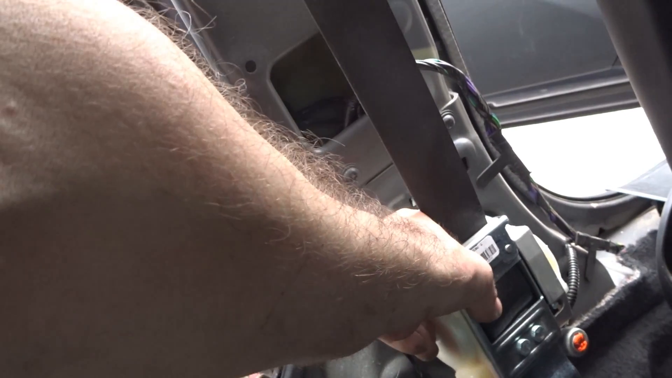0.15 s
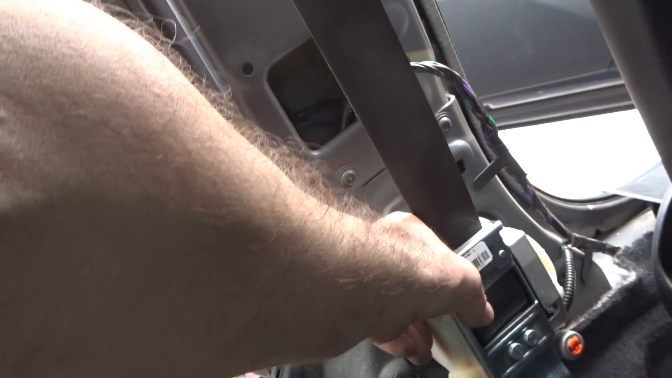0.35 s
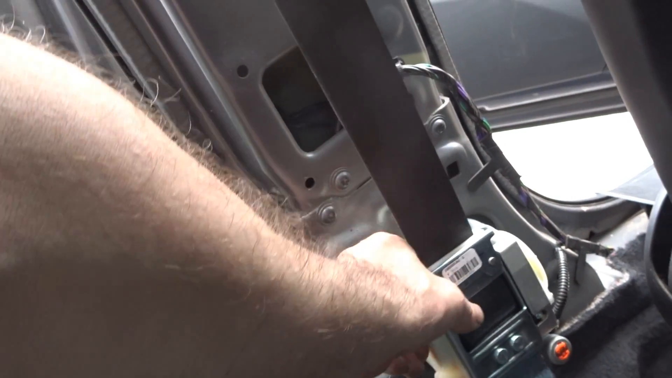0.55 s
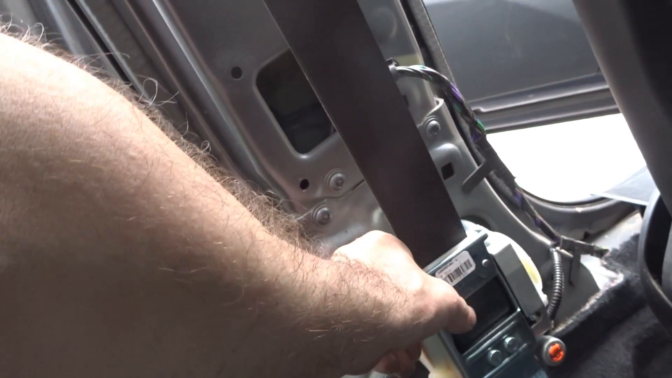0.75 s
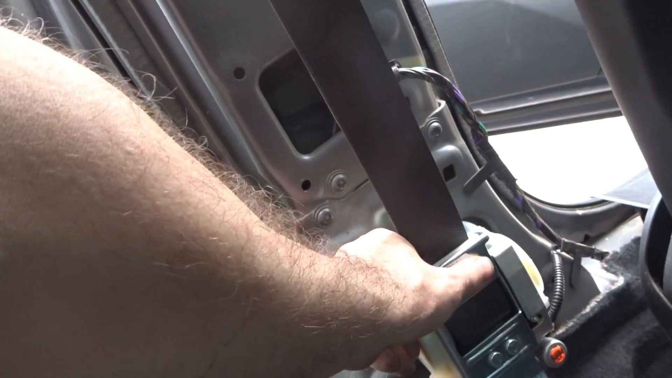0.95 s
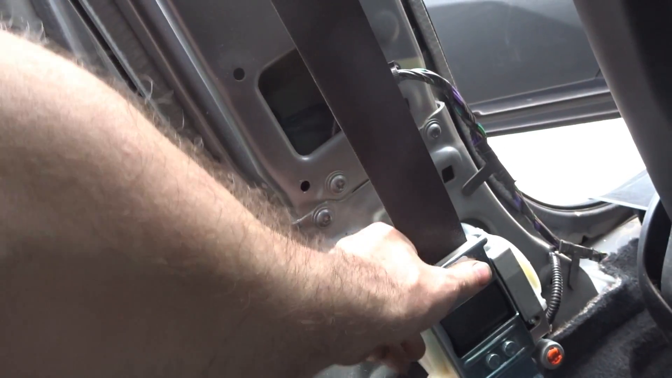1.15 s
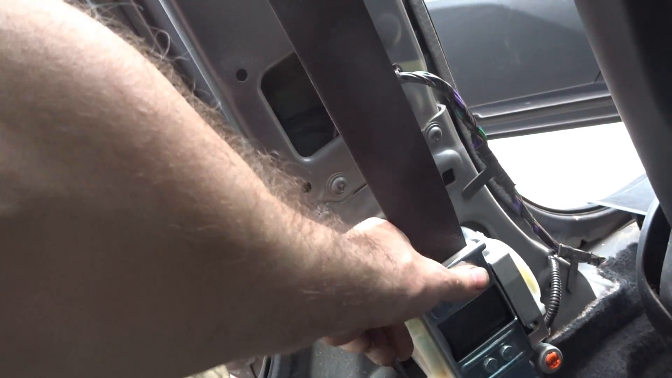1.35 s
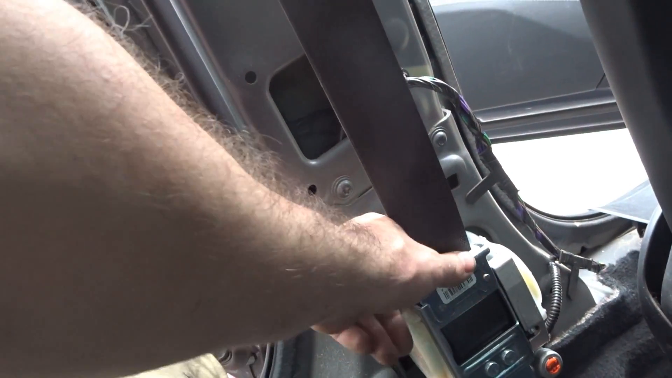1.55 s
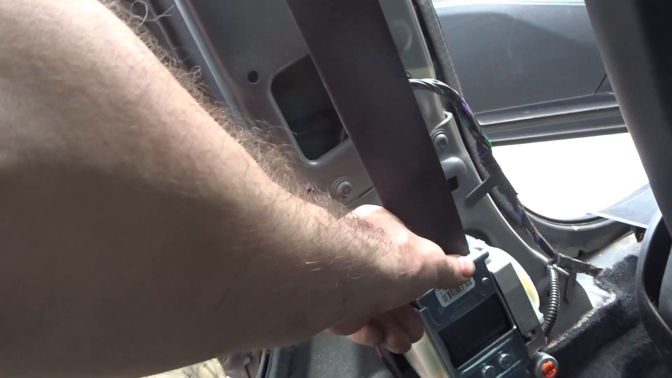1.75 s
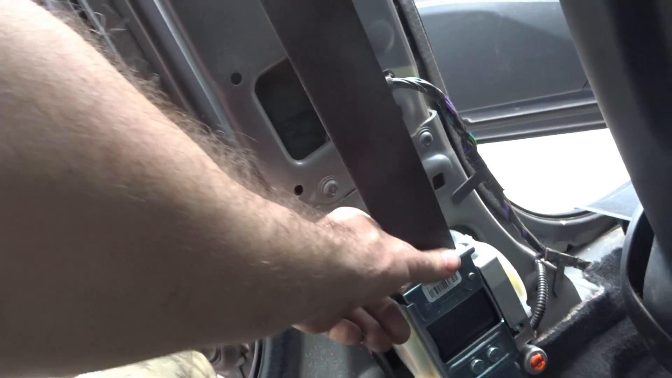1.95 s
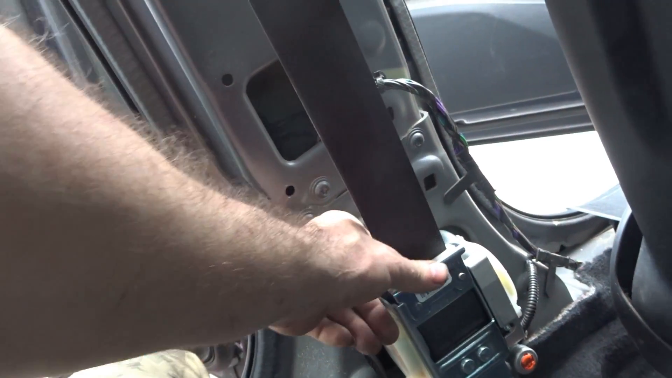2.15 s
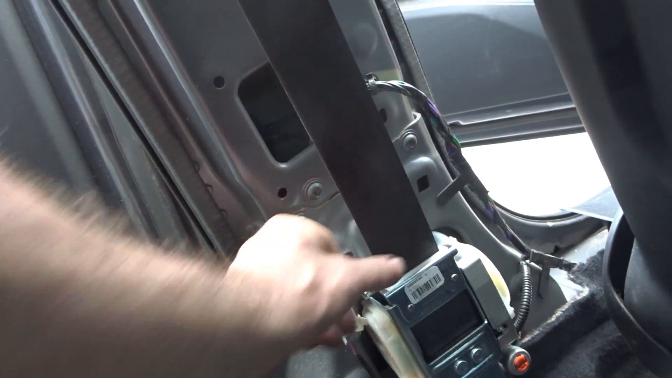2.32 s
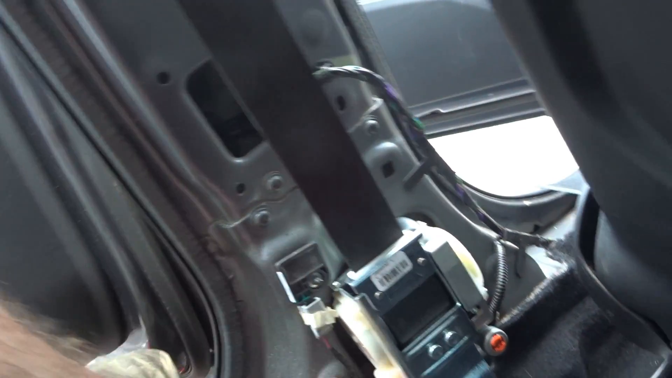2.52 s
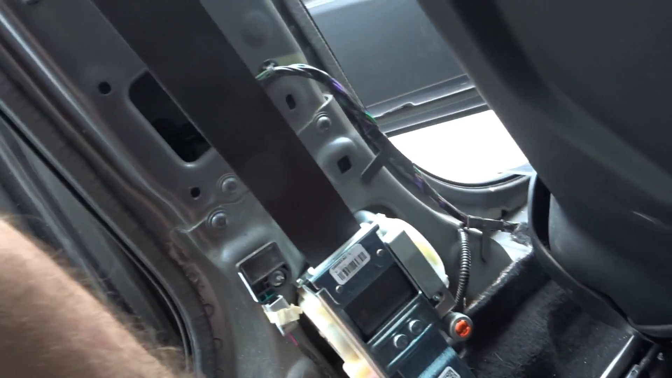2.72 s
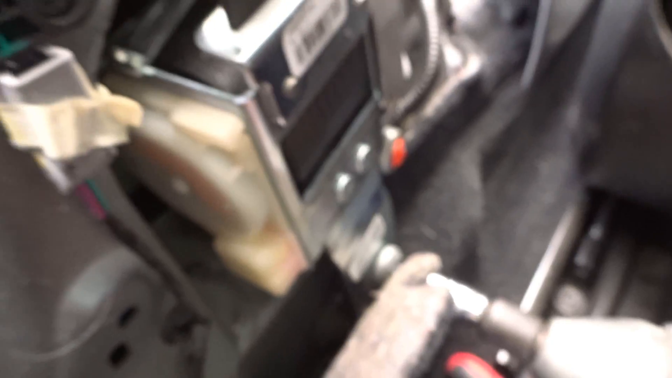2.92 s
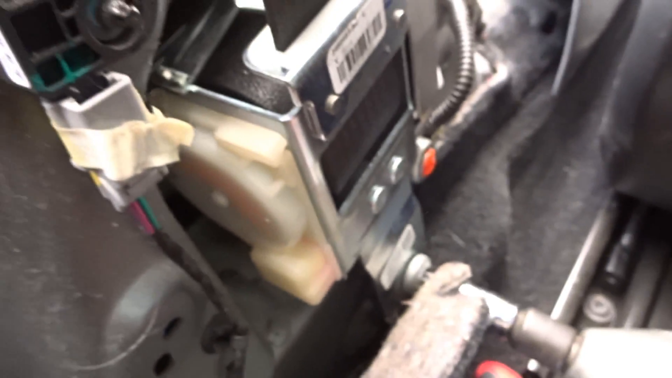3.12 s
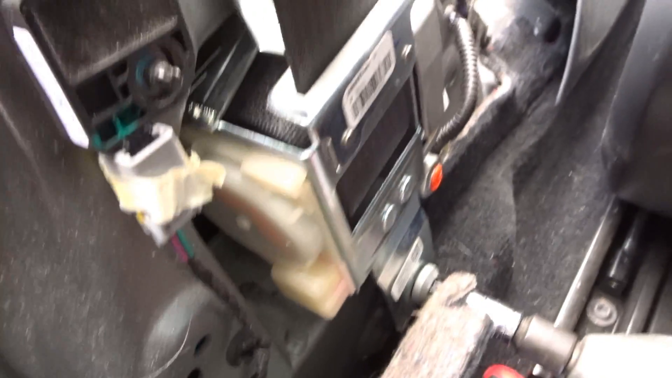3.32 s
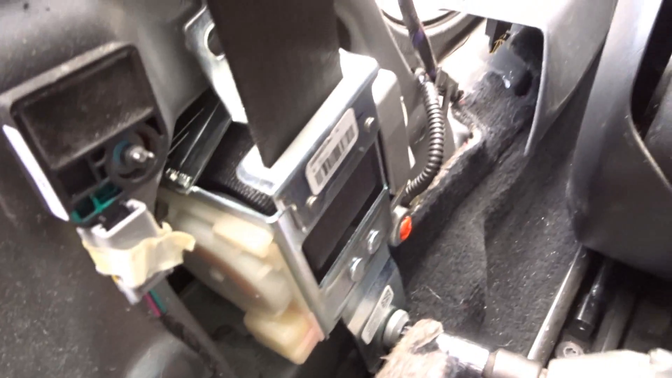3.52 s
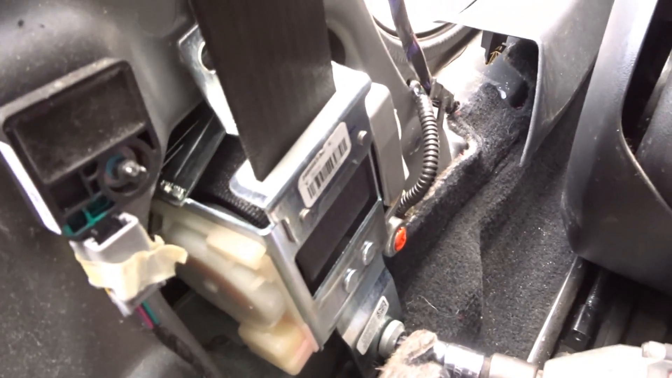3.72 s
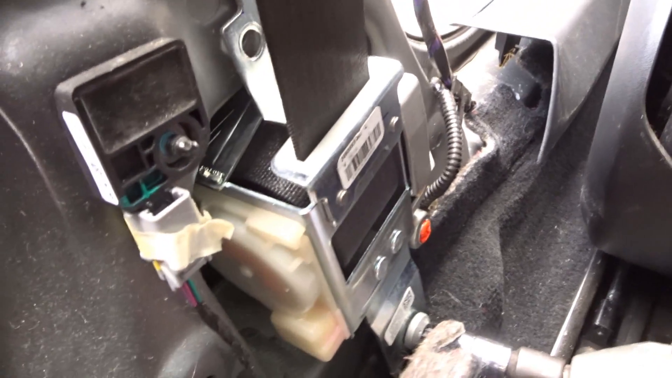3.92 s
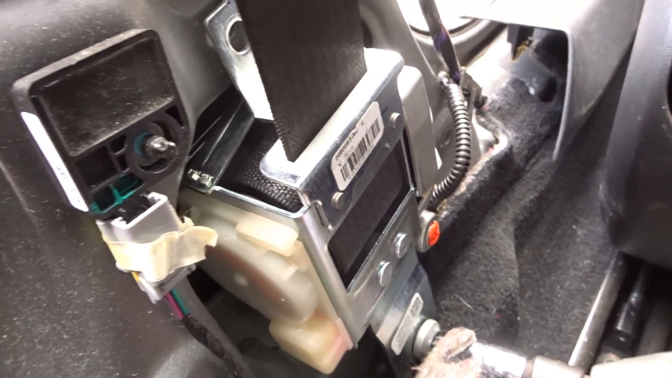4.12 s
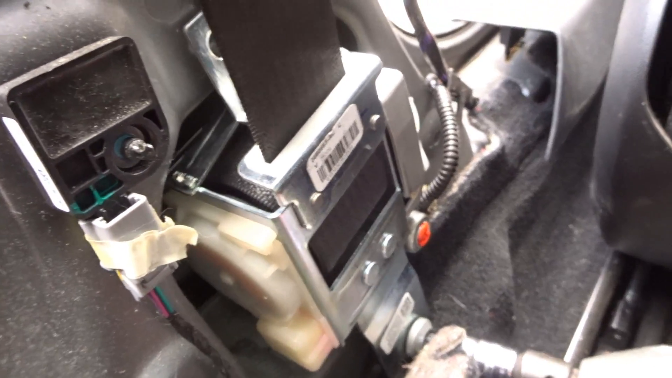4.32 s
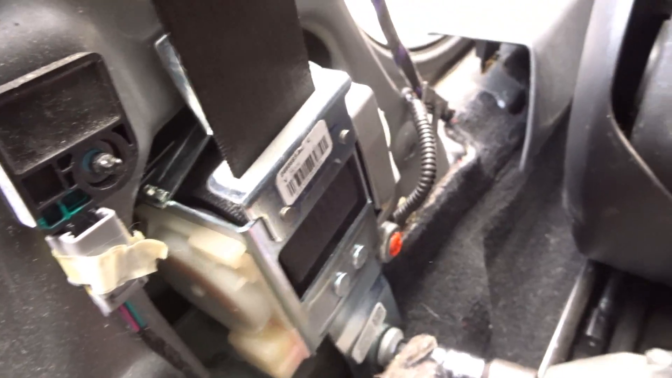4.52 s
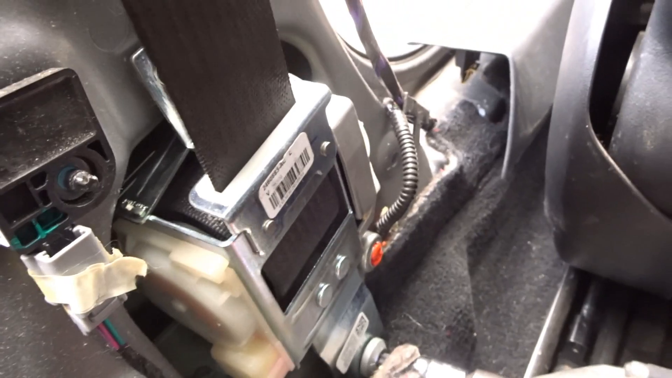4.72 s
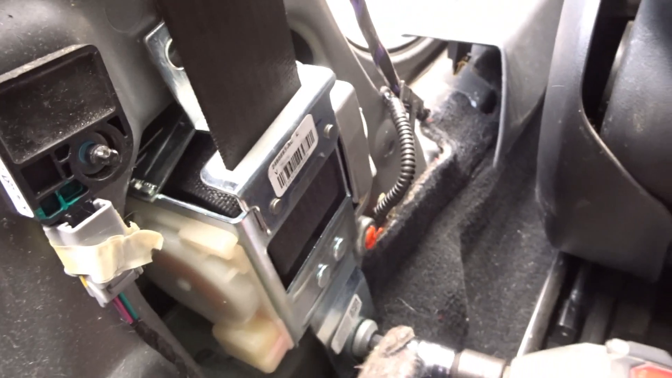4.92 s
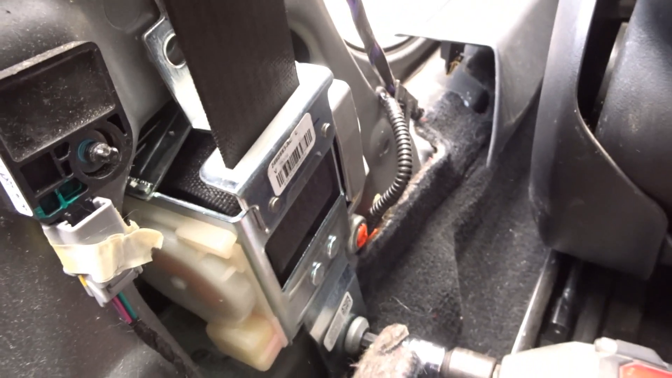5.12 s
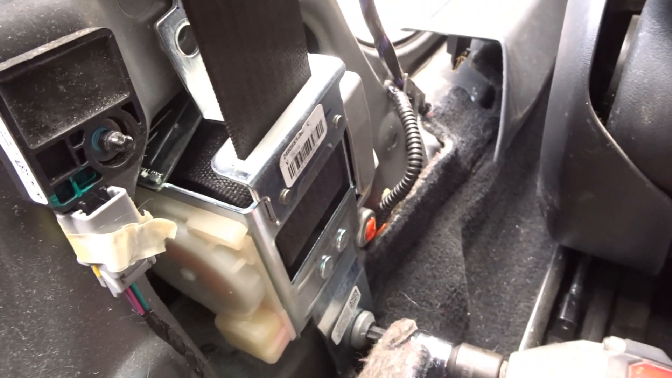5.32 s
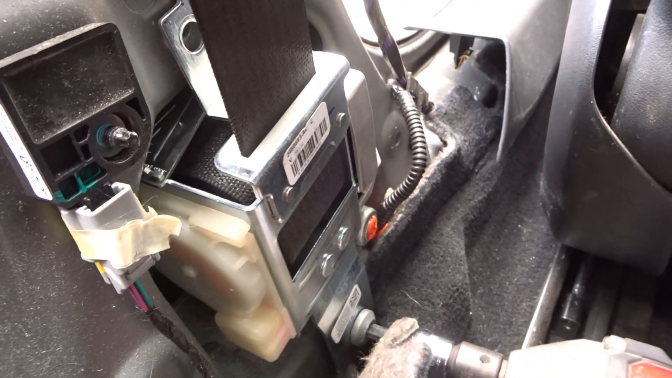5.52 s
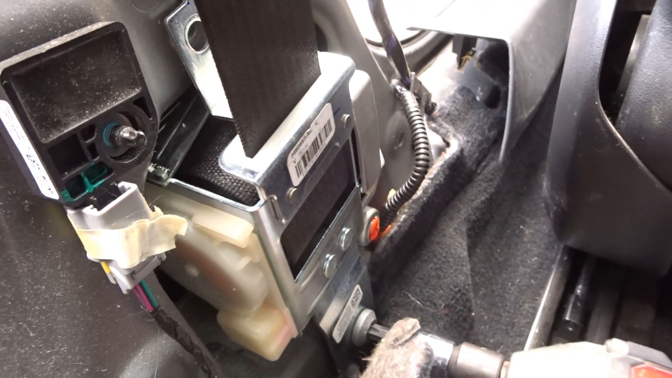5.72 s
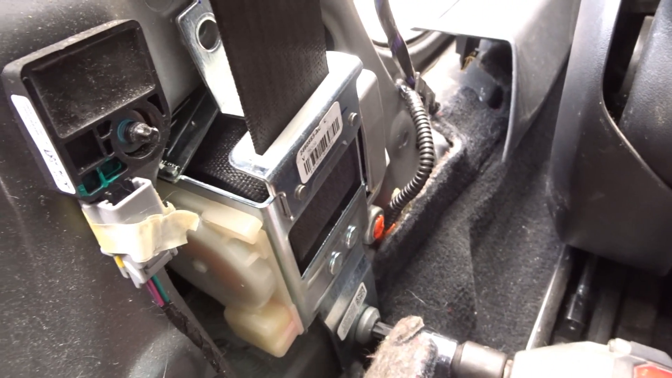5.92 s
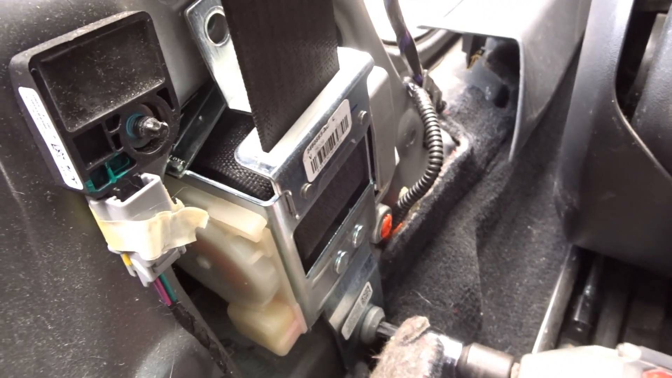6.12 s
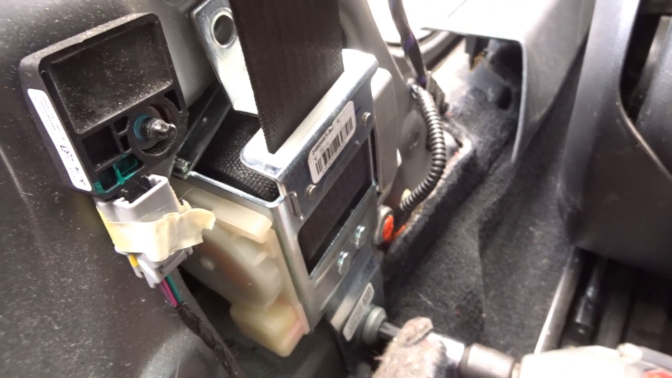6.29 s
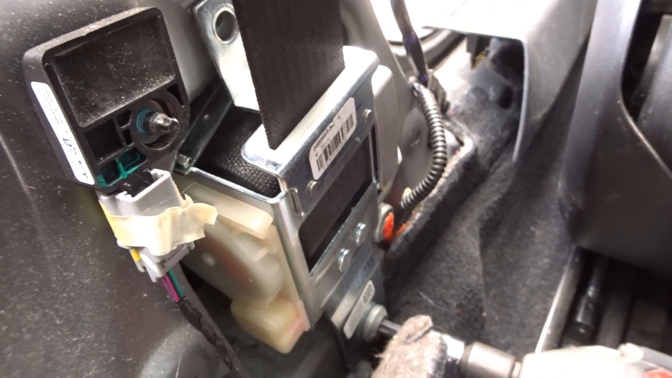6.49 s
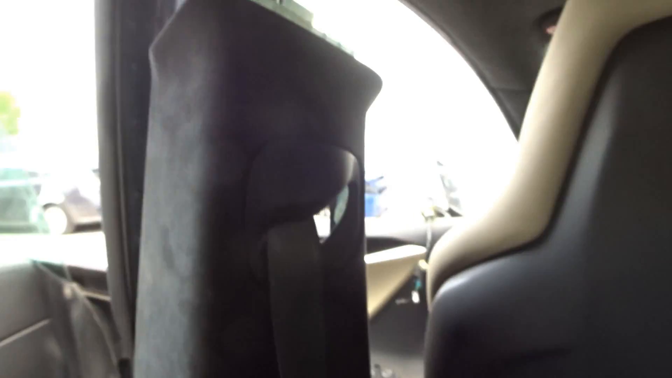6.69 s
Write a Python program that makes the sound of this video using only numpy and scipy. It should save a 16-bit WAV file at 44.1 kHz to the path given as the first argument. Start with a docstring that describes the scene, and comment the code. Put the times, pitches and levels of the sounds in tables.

```python
"""Inside a car in a repair shop, with machines humming behind, a hand seats a seat-belt retractor:
modal strikes clack and knock on the pillar, warbling sines and hiss zip the webbing, rough noise rubs the trim.
After an abrupt change of background a socket clicks and scrapes onto the bolt, then an impact wrench whistles
and hammers it tight in a long and a short burst: noisy blows rattle resonances of socket, bracket and pillar."""
import sys
import numpy as np
from scipy import signal
from scipy.fft import rfft, irfft, next_fast_len
from scipy.io import wavfile
from scipy.ndimage import uniform_filter1d, map_coordinates

SR = 44100
rng = np.random.default_rng(int(sys.argv[2]) if len(sys.argv) > 2 else 0)


def transcribe(signal):
    """Save signal, clipped to [-1, 1], as a 16-bit WAV file at the path in sys.argv[1]."""
    frames = np.atleast_2d(signal).T
    limited = np.clip(frames, -1, 1)
    pcm = np.round(limited * 32767).astype(np.int16)
    wavfile.write(sys.argv[1], SR, pcm)


N = 297675
T = np.arange(N) / SR  # seconds

# stereo width of the close sounds: pitch_hz, left_right_likeness (-1 to 1)
NEAR_ALIKE = [(200, 1), (1200, 0.85), (3500, 0.42), (8000, 0)]
# spectrum of socket clicks and scrapes: pitch_hz, density_db (per Hz)
CLICK_COLOUR = [(120, -53), (200, -19), (806, -6), (2090, -8.5), (2380, -1.5), (3130, -5), (3430, -9.5),
                (3760, -8.5), (4600, -7.5), (11700, -33), (16000, -50)]
# trigger pulls: full_speed_s, release_s, level_db, panel_db, bracket_ring_db
BURSTS = [(4.29, 5.882, -17, 0, 0), (6.116, 6.528, -17, -2.2, -5)]


def amp(db):
    """Decibels to gain."""
    return 10 ** (np.asarray(db) / 20)


def unit(x):
    """Scale to rms 1."""
    return x / np.sqrt(np.mean(x ** 2) + 1e-20)


def along(points, hz):
    """Read (Hz, value) points on a log frequency axis."""
    point_hz, value = np.transpose(points)
    return np.interp(np.log(hz + 1), np.log(point_hz + 1), value)


def curve(rows):
    """Draw a (s, value) table as one value per sample."""
    return np.interp(T, *np.transpose(rows))


def bell(s, length, db):
    """A smooth rise and fall in dB around time s."""
    return db * np.exp(-((T - s) / length) ** 2)


def wobble(rate):
    """A smooth random curve, rate knots a second."""
    coarse = T[::16]
    knots = rng.standard_normal(int(N * rate / SR) + 4)
    return np.interp(T, coarse, map_coordinates(knots, [coarse * rate]))


def stroke(start, end, db, drift, attack, release):
    """Level in dB of a sound that rises, holds with a slow drift and dies away; slopes in dB per s."""
    held = db + drift * (np.clip(T, start, end) - start)
    level = held - attack * np.maximum(start - T, 0) - release * np.maximum(T - end, 0)
    return np.maximum(level, -200)


def filtered(x, response):
    """Multiply the spectrum of x by a function of frequency."""
    n = x.shape[-1]
    m = next_fast_len(n + 8192)
    return irfft(rfft(x, m) * response(np.fft.rfftfreq(m, 1 / SR)), m)[..., :n]


def coloured(x, spectrum, size=4096):
    """Causal (minimum-phase) colouring, so that attacks stay sharp."""
    level_db = np.maximum(along(spectrum, np.fft.rfftfreq(size, 1 / SR)), -100)
    cepstrum = irfft(np.log(amp(level_db)))
    # fold the cepstrum onto positive time
    cepstrum[1:size // 2] *= 2
    cepstrum[size // 2 + 1:] = 0
    impulse = irfft(np.exp(rfft(cepstrum)))
    return signal.fftconvolve(x, impulse[None], axes=1)[:, :x.shape[1]]


def resonate(x, modes):
    """Ring x through a bank of (Hz, width Hz, dB) resonances."""
    def response(f):
        return sum(amp(db) * 1j * f * w / (c * c - f * f + 1j * f * w) for c, w, db in modes)
    return filtered(x, response)


def stereo(pair, alike):
    """Blend two unrelated signals to a given left-right likeness."""
    def mid_side_gain(hz):
        return np.sqrt(1 + np.outer([1, -1], np.clip(along(alike, hz), -.99, .99)))
    mid, side = filtered(pair, mid_side_gain)
    return np.array([mid + side, mid - side]) / np.sqrt(2)


def noise(spectrum, alike):
    """Coloured stereo noise of rms 1."""
    return unit(stereo(coloured(rng.standard_normal((2, N)), spectrum), alike))


def tone(hz, db, waver=0.49):
    """A sine around the given rms level, slightly unsteady in level and phase."""
    return np.sqrt(2) * amp(db + wobble(4.8)) * np.sin(2 * np.pi * hz * T + waver * wobble(28))


def tones(rows):
    """Unsteady sines that fade in and out over 28 ms."""
    total = 0
    for start, end, hz, db in rows:
        fade = np.clip(np.minimum(T - start, end - T) / 0.028, 0, 1)
        total = total + fade * tone(hz, db)
    return total


def patchy(x, depth_db):
    """Uneven gain over time and frequency, so that no two contacts have quite the same colour."""
    z = signal.stft(x, nperseg=256)[2]
    field = rng.standard_normal(z.shape[1:])
    field = uniform_filter1d(uniform_filter1d(field, size=6, axis=0), size=3, axis=1)
    return signal.istft(z * amp(depth_db * unit(field)), nperseg=256)[1][:, :N]


def add(track, s, x):
    """Mix x into the track at time s."""
    i = max(round(s * SR), 0)
    track[..., i:i + x.shape[-1]] += x[..., :max(N - i, 0)]


def strikes(events, colour, modes, t60, pan_db, attack):
    """Each contact is a short crash of coloured noise plus the clear decaying modes of the part."""
    out, t = np.zeros((2, N)), np.arange(SR // 5) / SR
    rise = 1 - np.exp(-t / attack)
    for s, db, treble_db, ring_db in events:
        burst = rng.standard_normal((2, len(t))) * rise * amp(-60 * t / t60)
        crash = stereo(coloured(burst, colour), NEAR_ALIKE)
        ring = np.zeros_like(crash)
        for hz, level, life in modes:
            phase = rng.uniform(0, 2 * np.pi) + rng.normal(0, 0.36, (2, 1))
            strength_db = level + rng.normal(0, 2.5)
            ring += amp(strength_db - 60 * t / life) * rise * np.sin(2 * np.pi * hz * t + phase)
        # each contact has its own brightness; the small parts radiate no deep bass
        tilt = [(30, -31.0), (110, 0.5), (2500, 2.5), (7000, treble_db)]
        hit = coloured(unit(crash) + amp(ring_db) * unit(ring), tilt)
        onset_size = np.std(hit[:, :SR // 200])  # first 5 ms
        add(out, s, amp(db) * hit / onset_size)
    return out * amp([[pan_db / 2], [-pan_db / 2]])


def room(x, decay):
    """Diffuse echoes from decaying noise; each frequency dies at its own speed."""
    hz, t, z = signal.stft(rng.standard_normal((2, SR // 2)), SR, nperseg=256)
    tail = signal.istft(z * amp(-60 * t / along(decay, hz)[:, None]), SR, nperseg=256)[1]
    delayed = np.pad(tail, ((0, 0), (SR // 400, 0)))  # 2.5 ms
    tail = stereo(delayed, NEAR_ALIKE)
    return signal.fftconvolve(x, tail / np.linalg.norm(tail[0]), axes=1)[:, :N]


def shop():
    """Fans and machines: coloured noise for the rush of air, with slightly unsteady tones."""
    # air level before and after the change: start_s, end_s, level_db, drift_db_per_s
    level_before, level_after = (-3.5, 5.5, -48, -0.63), (3, 4.5, -54.5, 4.5)
    # air spectra: pitch_hz, density_db (per Hz)
    air_before, air_after = [(18, -96), (30, -38), (239, -19), (311, -6.5), (449, -9.5), (600, -12),
                             (1070, -13.5), (1190, -13.5), (1860, -19), (2900, -24), (3220, -19),
                             (3490, -28), (5590, -28), (6210, -30.5), (16000, -47.5)], [(30, -47), (64, -46.5), (88, -19.5), (190, -23),
                                                 (320, -11.5), (420, -6.5), (520, -10), (850, -2),
                                                 (1080, -2.5), (1400, -6), (1650, -12), (2300, -15),
                                                 (2700, -22), (6000, -24), (16000, -42.5)]
    # stereo width of the air: pitch_hz, left_right_likeness (-1 to 1)
    air_alike = [(60, 0.81), (180, 1), (550, 0.92), (1650, 0.64), (4970, -0.063), (15000, -0.57)]
    # machine tones: start_s, end_s, pitch_hz, level_db
    hum = [(0, 2.96, 312, -61), (0, 2.96, 587, -67), (0, 2.96, 1233, -68), (0, 2.96, 5399, -75),
           (0, 2.96, 5760, -78), (0, 2.96, 4560, -81), (3.8, 4.25, 5400, -72), (3.75, 4.25, 5760, -78),
           (3.0, 4.3, 425, -71), (3.25, 3.55, 2265, -72)]
    change_s = 2.963
    in_db_per_s, out_db_per_s, faint_db = 210, 66, -85.5  # fades in, then sinks away under the wrench
    whine_hz, whine_db, whine_fade_db_per_s = 3157, -58.5, 2.5  # the strongest machine whine

    sway_db = .5 * wobble(7.6)
    before = amp(stroke(*level_before, 0, 0)) * noise(air_before, air_alike)
    before += tone(whine_hz, whine_db - whine_fade_db_per_s * T)
    after_gain = amp(stroke(*level_after, in_db_per_s, out_db_per_s)) + amp(faint_db)
    after = after_gain * noise(air_after, air_alike)
    return amp(sway_db) * np.where(T < change_s, before, after) + tones(hum)


def clacks():
    """The retractor strikes the pillar and its metal frame rings."""
    # contacts: start_s, level_db, treble_db, ring_db
    contacts = [(0.0, -25.5, 6, -5), (0.323, -39, 0, -11), (0.355, -26, 5, -17), (0.368, -24.5, -4, -9),
                (0.399, -33, 2, -4), (0.436, -38, 3, -16), (0.679, -40, -37, -10), (0.758, -39, -17, 2),
                (1.132, -42, -8, 0), (1.397, -24, 1.5, 1.5), (1.64, -21, 5, 2.5), (1.646, -30, 2, 0)]
    # crash spectrum: pitch_hz, density_db (per Hz)
    crash_colour = [(200, -18), (500, -7.5), (900, -20.5), (1350, 2.5), (1850, -4), (2500, -10),
                    (3050, 0.5), (3600, -1.5), (5300, -7.5), (7000, -11.5), (8500, -19.5), (12700, -32.5),
                    (16000, -52)]
    # modes of the frame: pitch_hz, level_db, t60_s
    frame = [(1234, -6, 0.11), (1370, -22, 0.05), (2187, -9, 0.079), (2580, -12, 0.058), (2954, 1.5, 0.04),
             (3460, 0.5, 0.051), (3654, 4.5, 0.056), (4900, -28, .05), (5180, -10, 0.063), (7670, -4, 0.06),
             (12470, -28, 0.066)]
    return strikes(contacts, crash_colour, frame, t60=0.067, pan_db=1.0, attack=0.0004)


def knocks():
    """Dull knocks on the body excite the low modes of the pillar."""
    # contacts: start_s, level_db, treble_db, ring_db
    contacts = [(0.304, -40.5, 8, -9), (1.391, -30.5, 2, -2), (1.568, -33, 0, 7), (1.738, -36, 14, 5),
                (1.777, -44.5, -3, -15), (1.837, -40.5, -5, 6), (2.054, -45.5, 2, -10),
                (2.495, -42.5, 4, -17), (2.519, -40.5, 13, -19), (2.594, -37, -7, -13),
                (2.617, -39.5, -6, -12), (2.849, -41.5, 12, -2)]
    # crash spectrum: pitch_hz, density_db (per Hz)
    crash_colour = [(25, -44), (60, -31), (130, -15), (400, 3.5), (900, 4.5), (1600, -1), (3000, -12),
                    (8000, -52), (16000, -49)]
    # modes of the pillar: pitch_hz, level_db, t60_s
    pillar = [(136, -17.5, 0.14), (332, 0, 0.061), (486, 8, 0.013), (750, -6.5, 0.036)]
    return strikes(contacts, crash_colour, pillar, t60=0.065, pan_db=0.5, attack=0.00037)


def webbing(overtone=1.28, overtone_db=-15, hiss_db=1, rough=1.8):
    """The weave sings in the guide, higher and louder the faster the belt runs."""
    # belt speed, heard as the pitch of the weave: time_s, pitch_hz
    belt_pitch = [(1.3, 7900), (1.355, 11500), (1.41, 12200), (1.47, 11600), (1.56, 9900), (1.7, 9230),
                  (1.755, 8000)]
    top_speed_db, db_per_octave, fade_s = -52.5, 13, .045

    pitch = curve(belt_pitch) * (1 + .009 * wobble(45))
    phase = 2 * np.pi * np.cumsum(pitch) / SR
    channels = []
    for _ in range(2):
        weave = np.sin(phase + rough * wobble(550))
        upper = np.sin(overtone * phase + 2 * wobble(700))
        channels.append(weave + amp(overtone_db) * upper)
    zip_tone = np.array(channels)
    hiss = noise([(100, -58.5), (1000, -5), (3500, -6), (8000, -21), (15000, -23.0)], NEAR_ALIKE)
    moving = np.clip(np.minimum(T - belt_pitch[0][0], belt_pitch[-1][0] - T) / fade_s, 0, 1)
    level_db = top_speed_db + db_per_octave * np.log2(pitch / pitch.max()) + 2 * wobble(35.05)
    return moving * amp(level_db) * (zip_tone + amp(hiss_db) * hiss)


def arm_rubbing(attack=220):
    """The arm rubs on the trim: noise in tiny uneven jerks as skin and cloth catch and slip."""
    # the rub: start_s, end_s, level_db, drift_db_per_s
    rub = (2.5, 2.955, -46.5, -4)
    # its spectrum: pitch_hz, density_db (per Hz)
    rub_colour = [(29, -55), (50, -38), (141, -2), (271, -13.5), (389, 7.5), (472, -7), (1100, -1.5),
                  (1240, 0), (2380, -6), (3250, -8.5), (16000, -40)]
    end_s = 2.963  # cut off with the change of background

    jerks_db = 2.4 * wobble(260) + 1.4 * wobble(38)
    friction = unit(amp(jerks_db) * noise(rub_colour, NEAR_ALIKE))
    return (T < end_s) * amp(stroke(*rub, attack, 0)) * friction


def bumps(attack=0.006):
    """The arm bumps softly and sets the trim panel swinging briefly in its low modes."""
    # pushes: start_s, level_db
    pushes = [(2.521, -55), (2.625, -48), (2.7, -54), (2.845, -49)]
    # modes of the panel: pitch_hz, level_db, t60_s
    trim = [(85, -11, 0.088), (128, -2, 0.15), (152, -1, .12)]
    out, t = np.zeros(N), np.arange(SR // 4) / SR
    for s, db in pushes:
        swing = 0
        for hz, level, life in trim:
            swing = swing + amp(level - 60 * t / life) * np.sin(2 * np.pi * (hz * t + rng.uniform()))
        add(out, s, amp(db) * (1 - np.exp(-t / attack)) * swing)
    return out


def clicks():
    """Socket and trigger click: short crashes with the ring of the steel socket."""
    # contacts: start_s, level_db, treble_db, ring_db
    contacts = [(2.738, -37, 4.5, -12), (2.885, -41.5, 1, -2), (3.564, -38.5, -19, -17),
                (3.604, -27, 4, -13), (3.623, -34.5, 1, -20), (3.638, -38, 4, -14), (3.709, -25.5, 5, 2),
                (3.736, -43, 1, -2.5), (3.991, -50, -21, -5.5), (4.168, -38.5, -24, -22),
                (4.183, -43, -11.5, -9.5), (4.207, -42, 7.5, -8), (6.051, -60, 9, -17)]
    # modes of the socket: pitch_hz, level_db, t60_s
    socket = [(880, -5.5, 0.17), (2290, -15.5, .04), (3414, 13, 0.027), (4290, -13, .04), (4587, -23.5, .3),
              (5900, -10.5, 0.064)]
    return strikes(contacts, CLICK_COLOUR, socket, t60=.03, pan_db=1.0, attack=0.00099)


def scraping():
    """The socket scrapes on the bolt head: noise in tiny uneven jerks as steel catches and slips."""
    # scrapes: start_s, end_s, level_db, drift_db_per_s
    scrapes = [(3.568, 3.6, -46.5, -60), (3.612, 3.685, -40.5, -92), (4.229, 4.28, -55.5, 101.5)]
    in_db_per_s, out_db_per_s = 1600, 118
    pressure = sum(amp(stroke(*row, in_db_per_s, out_db_per_s)) for row in scrapes)
    return pressure * unit(amp(3.3 * wobble(300)) * noise(CLICK_COLOUR, NEAR_ALIKE))


def whistles():
    """Thin unsteady sines: the wrench whistles as it starts and stops, and a faint high whine sounds at 6.6 s."""
    # whistles: start_s, end_s, pitch_hz, level_db
    lines = [(4.215, 4.31, 7800, -61), (4.22, 4.31, 15500, -61), (6.06, 6.12, 15500, -70),
             (6.58, 6.68, 11900, -73.5)]
    return tones(lines)


def trigger():
    """Each pull spins the wrench up and lets it go: drive gain; spin-up lag, panel and bracket levels in dB."""
    open_db_per_s, close_db_per_s = 1049.5, 1099  # the drive starts and stops
    spin_up_db, spin_up_s = 8, 0.073  # the first blows are weaker
    drive, lag_db, panel_db, bracket_db = np.zeros((4, N))
    for start, end, db, panel, bracket in BURSTS:
        drive += amp(stroke(start, end, db, 0, open_db_per_s, close_db_per_s))
        on = T > start - .1
        lag_db[on] = spin_up_db * np.exp(-np.maximum(T[on] - start, 0) / spin_up_s)
        panel_db[on], bracket_db[on] = panel, bracket
    return drive, lag_db, panel_db, bracket_db


def hammer(scatter_db=1.08, jitter=0.032, tick_db=-15):
    """Every turn the hammer strikes the anvil, chatters and rebounds: decaying noise with hard ticks."""
    # runs of even hammering, between which the hammer slips: first_blow_s, end_s, rate_blows_per_s
    runs = [(4.291, 4.3, 25), (4.334, 4.51, 31), (4.534, 4.61, 31), (4.636, 4.91, 31.3), (4.933, 4.94, 22),
            (4.981, 5.2, 33.2), (5.230, 5.86, 32.45), (6.114, 6.12, 24), (6.157, 6.5, 33.2)]
    # contacts in one turn, from blow to rebound: share_of_turn, level_db, t60_s
    turn = [(0, -5, 0.087), (0.222, -7.5, .06), (0.359, -12, 0.04), (0.558, -13, 0.063), (.74, -6.5, .02),
            (.82, -3.5, 0.011)]
    power, ticks, t = np.zeros(N), np.zeros(N), np.arange(SR // 10) / SR
    for first, end, rate in runs:
        for s in np.arange(first, end, 1 / rate):
            for share, db, t60 in turn:
                # the main blow keeps strict time
                when = s + (share + jitter * rng.normal() * (share > 0)) / rate
                size = amp(db + scatter_db * rng.normal())
                add(power, when, (size * amp(-60 * t / t60)) ** 2)
                add(ticks, when, size * rng.choice([-1, 1], 1))
    # loose parts keep buzzing between the contacts, in quick uneven bursts
    buzz = .03
    chatter = amp(1.5 * wobble(330))
    clatter = unit(chatter * np.sqrt(power + buzz) * rng.standard_normal((2, N)))
    tick_pair = np.array([ticks, np.roll(ticks, 2)])  # right side two samples later
    return clatter + amp(tick_db) * unit(tick_pair)


def wrench(first_blow_db=4, first_blow_s=0.0055):
    """Blows ring socket, bracket and panel; as the bolt seats, the thread hisses less and the steel rings out."""
    # spectra of blows and thread hiss: pitch_hz, density_db (per Hz)
    blow_colour, hiss_colour = [(25, -44.5), (97, -38), (170, -28.5), (256, -24), (340, -14), (480, -11.5),
                                (610, -14.5), (900, -7), (1750, -7), (2350, -5), (2980, -6.5), (3600, -4),
                                (5300, -6.5), (6400, -8.5), (8000, -6.5), (12000, -13.5), (15800, -16.5)], [(30, -52.5), (200, -28.5), (900, 0.5), (2500, 0.5),
                                                       (4500, 0.5), (5800, 5.5), (6800, -7.5),
                                                       (9800, -18.5), (12100, 1.5), (14000, -23.5),
                                                       (16000, -24.5)]
    # stereo width: pitch_hz, left_right_likeness (-1 to 1)
    wrench_alike = [(100, 0.99), (400, 0.93), (1300, 0.8), (2400, 0.52), (4300, 0.32), (5500, -0.061),
                    (8000, -0.75), (11000, -0.68), (15000, .1)]
    # resonances of pillar, loaded socket and bracket: pitch_hz, width_hz, level_db
    pillar_rings = [(324, 24, -8), (538, 73, -5), (750, 35, -13.5), (1150, 15, -13), (1524, 150, -3.5),
                    (3273, 89, 2), (4550, 40, -14.5), (5070, 110, -7), (6830, 70, -18)]
    socket_rings, bracket_rings = [(4048, 50, 1.5), (4213, 70, 0), (4274, 80, -5.5)], [(2080, 70, -1.5), (2247, 90, -3), (2470, 150, -2),
                                                         (2735, 90, 0)]
    # the thread binds and the panel jolts as the bolt draws the retractor in: time_s, half_length_s, rise_db
    jolts = [(4.39, 0.017, 13), (4.585, 0.044, 7)]
    seat_s, seating_s = 4.73, 0.034  # when the bolt head seats, and how gradually
    turning_db, seated_db, seated_fade_db_per_s = -5, -10, 6.5  # thread hiss against the drive
    loose_damping_db = 6  # a loose bolt passes less ring on to socket and bracket
    socket_base_db, bracket_base_db, panel_base_db = 0.5, -1, -1
    # as the tension grows, first the socket rings out, then the clamped bracket: (s, half-length s, dB)
    socket_swell, bracket_swell = (5.05, .17, 6), (5.48, 0.28, 4.5)
    jolt_muffle_share, jolt_hiss_share = .22, .55 - .1  # of a jolt: taken from the blows, added to the hiss
    hiss_lag_share = .55  # share of the spin-up felt by the hiss

    drive, lag_db, panel_db, bracket_db = trigger()
    loose = .5 - .5 * np.tanh((T - seat_s) / seating_s / 2)
    seated_time = np.maximum(T - seat_s, 0)
    jolt_db = sum(bell(*row) for row in jolts)
    socket_db = socket_base_db + bell(*socket_swell) - loose_damping_db * loose
    bracket_db += bracket_base_db + bell(*bracket_swell) - loose_damping_db * loose
    panel_db += panel_base_db + jolt_db
    thread_db = turning_db * loose + (seated_db - seated_fade_db_per_s * seated_time) * (1 - loose)

    blows = coloured(stereo(patchy(hammer(), depth_db=1.27), wrench_alike), blow_colour)
    body = blows + resonate(blows, pillar_rings)
    # socket rings a little louder on the left, bracket a little louder on the right
    body += amp(socket_db) * resonate(blows, socket_rings) * amp([[2.5], [-2.5]])
    body += amp(bracket_db) * resonate(blows, bracket_rings) * amp([[-1], [1]])
    drumming = filtered(body, lambda hz: 1 / (1 + (hz / 950) ** 4))
    body += (amp(panel_db) - 1) * drumming
    body /= np.sqrt(np.average(np.mean(body ** 2, axis=0), weights=drive ** 2))

    # the first blow takes up the slack with a snap; a binding thread muffles the blows
    snap_db = sum(bell(row[0] + first_blow_s, first_blow_s, first_blow_db) for row in BURSTS)
    force_db = snap_db - lag_db - jolt_muffle_share * jolt_db
    hiss_db = thread_db + jolt_hiss_share * jolt_db - hiss_lag_share * lag_db
    return drive * (amp(force_db) * body + amp(hiss_db) * noise(hiss_colour, wrench_alike))


def scene():
    """Close sounds fill the cabin and echo faintly from the hall."""
    # echo decay: pitch_hz, t60_s
    cabin, hall = [(150, 0.17), (1500, 0.13), (12000, 0.1)], [(150, 0.57), (2000, 0.43), (5000, 0.43), (12000, .2)]
    near = clacks() + knocks() + webbing() + arm_rubbing() + bumps()
    near += clicks() + scraping() + whistles() + wrench()
    return near + amp(-11.5) * room(near, cabin) + amp(-37.0) * room(near, hall) + shop()


def record(dry, ceiling=0.82, lead=.00002, low_cut_hz=28, top_hz=15900):
    """The right channel leads by 20 microseconds, loud peaks are rounded off, rumble and top are cut."""
    ports = filtered(dry, lambda hz: np.exp(1j * np.pi * lead * np.outer([-1, 1], hz)))
    rounded = ports / (1 + (ports / ceiling) ** 8) ** (1 / 8)
    thinned = filtered(rounded, lambda hz: hz / np.hypot(hz, low_cut_hz))
    return filtered(thinned, lambda hz: np.clip((top_hz - hz) / 200 + .5, 0, 1))


dry = scene()
out = record(dry)
transcribe(out)
```